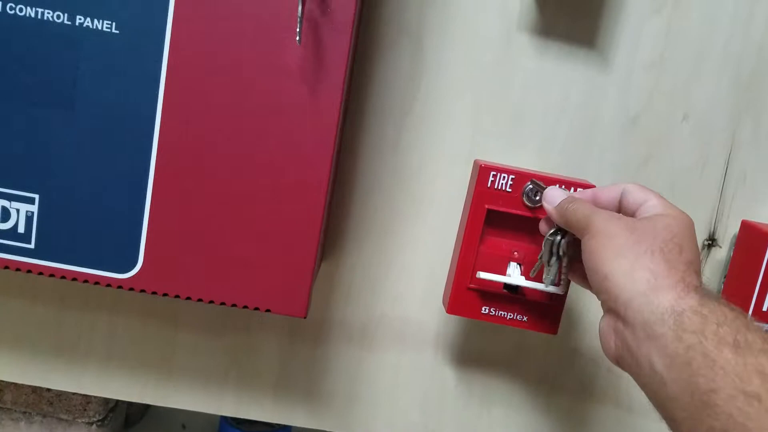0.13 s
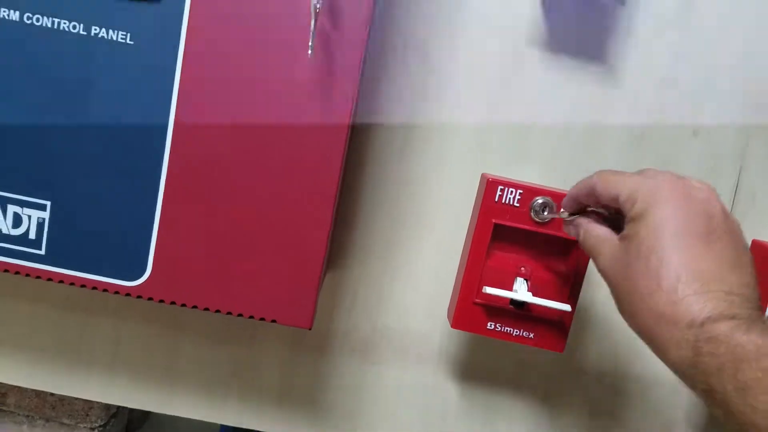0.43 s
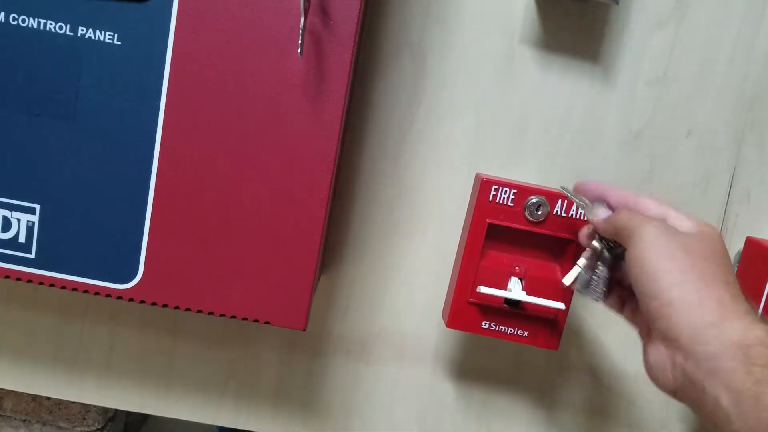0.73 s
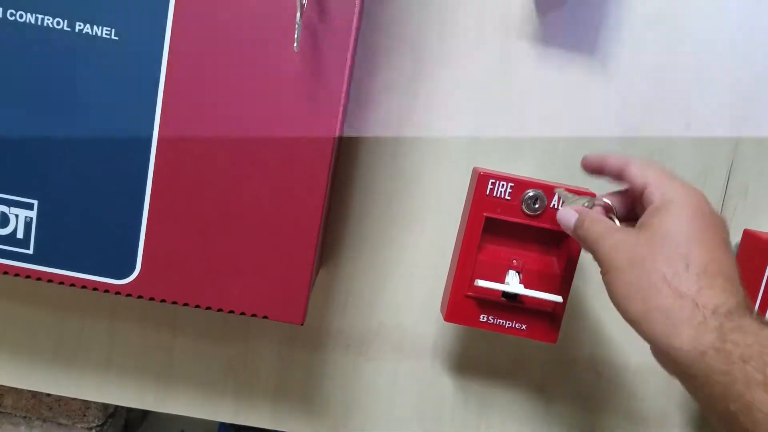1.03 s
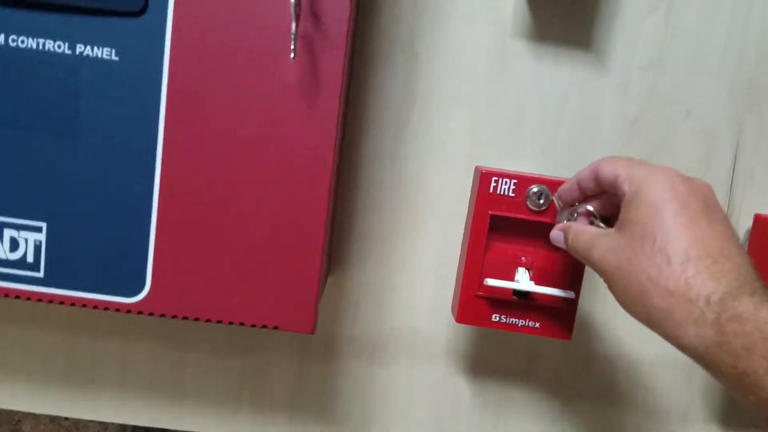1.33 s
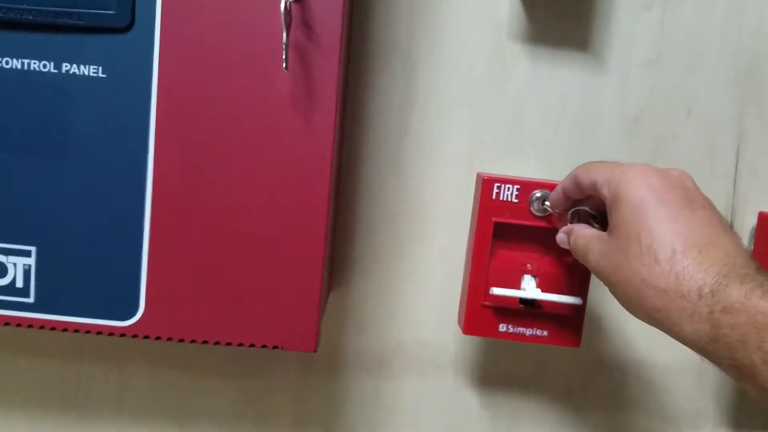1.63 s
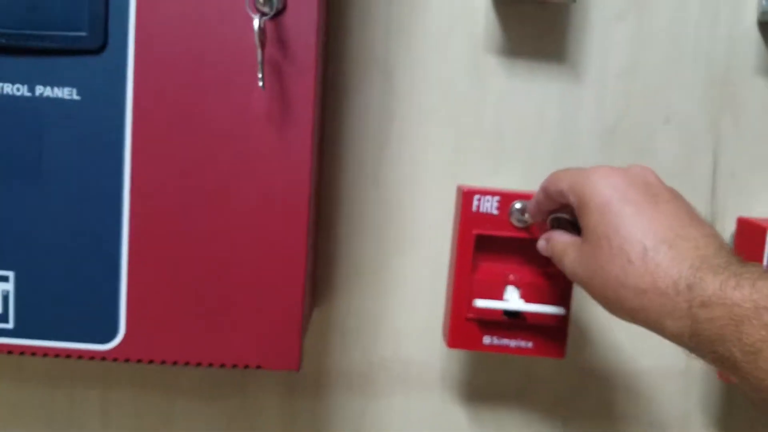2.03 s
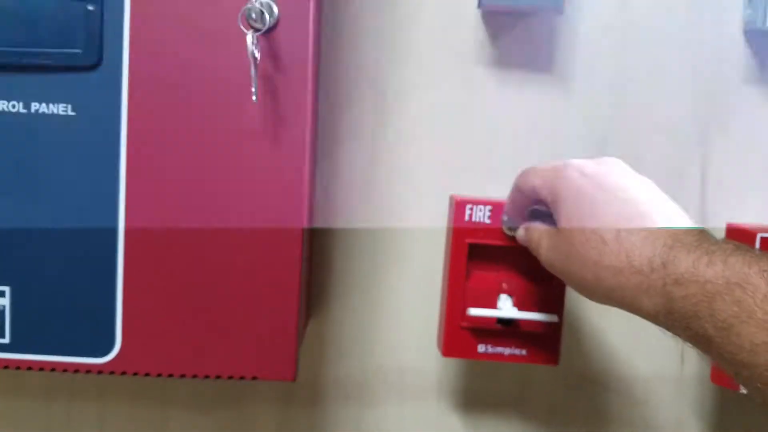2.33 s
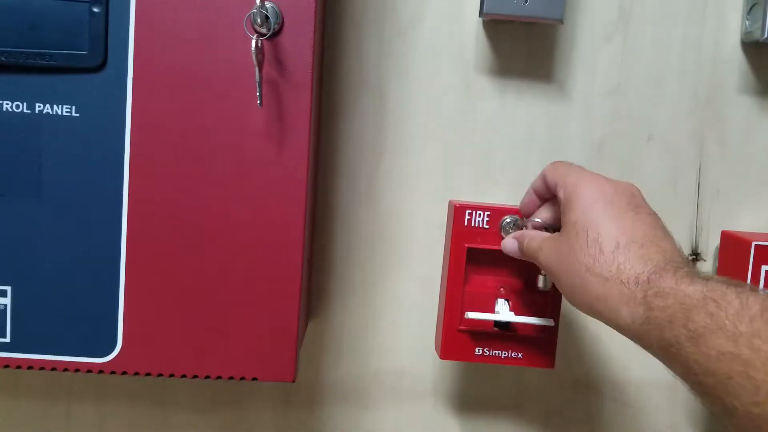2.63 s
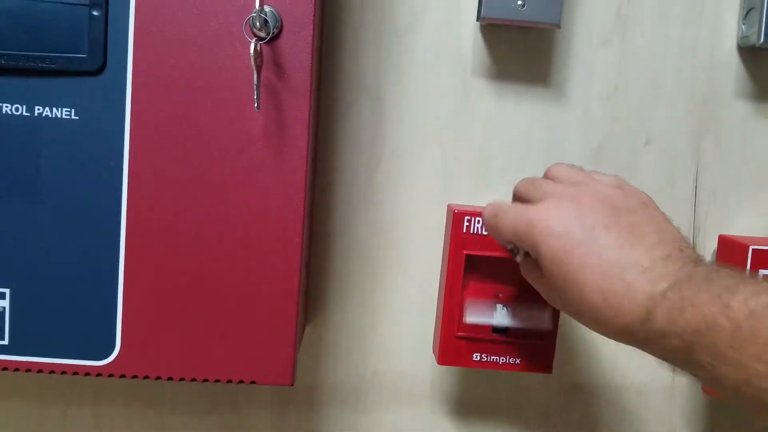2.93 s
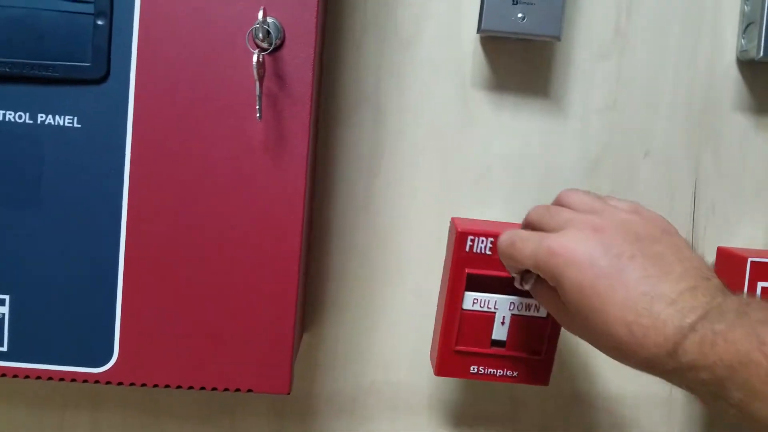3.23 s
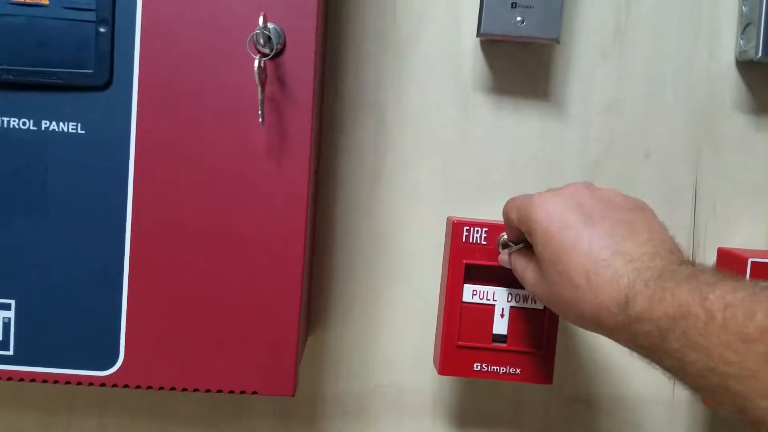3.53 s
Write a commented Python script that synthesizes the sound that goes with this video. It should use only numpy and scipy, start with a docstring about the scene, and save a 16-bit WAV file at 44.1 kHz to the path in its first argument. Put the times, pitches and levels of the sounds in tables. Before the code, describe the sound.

A key turns in the lock of a metal alarm box, close by. Keys clink lightly through the first second. The key knocks at the lock around 1.5 seconds, then scrapes and clicks from 2.2, making the box ring. Just before 3 seconds a sprung handle snaps back with a very loud, slightly distorted clack. Softer clicks follow until 3.7, with low hand rumble, in a faintly humming, echoing room.

```python
"""A key is pushed into the lock of a metal alarm box on a wall and turned.
It scrapes and knocks past the pins, which makes the box ring, while the other keys on the bunch clink.
Then the sprung handle snaps back with a clack that overloads the microphone.
Hands rumble softly, and the hard-walled room hums and echoes."""
import sys
import numpy as np
from scipy import signal
from scipy.fft import rfft, irfft
from scipy.io import wavfile

SR = 44100
rng = np.random.default_rng(int(sys.argv[2]) if len(sys.argv) > 2 else 0)


def output_pcm(signal):
    """Save a mono or channel-first signal as 16-bit PCM at the path in sys.argv[1].

    Samples are clipped to [-1, 1] before scaling.
    """
    pcm = np.clip(np.atleast_2d(signal).T, -1, 1) * 32767
    wavfile.write(sys.argv[1], SR, np.round(pcm).astype(np.int16))


N = 163170

# How alike the left and right channels are: f/Hz, likeness (1 = the same)
STEREO_LIKENESS = [(40, .5), (130, .95), (300, .95), (640, .88), (1400, .68), (2400, .35), (4200, -.2),
                   (8000, 0), (16000, .1)]
# The left microphone picks up the treble more strongly than the right: f/Hz, left minus right/dB
LEFT_LEAN = [(60, -3), (380, -1.5), (700, 0.5), (1300, 4), (2400, 8), (4400, 9), (8000, 0.5), (15000, 3)]


def lock():
    """The key scrapes over the pins and knocks the cylinder, which shakes the box."""
    # Each knock: t/s, body level/dB, thud level/dB, tick level/dB,
    # rise/s (long where the key rubs first), treble boost/dB (how bright or dull each knock rings)
    knocks = [(1.4763, -37, -54, -50, 0.00053, 7), (1.5101, -29.5, -46.5, -68, .001, -19),
              (1.5445, -22, -45, -36, 0.00071, -1.5), (1.5804, -26, -59, -64, 0.00053, -5.5),
              (1.834, -47, -75, -65, 0.00058, 9), (1.841, -46.5, -75, -59, 0.00091, 8.5),
              (1.8519, -33.5, -66, -46, 0.00046, 1.5), (2.123, -57.5, -57.5, -62, 0.0014, 11),
              (2.218, -43, -53, -60, 0.00011, 4.5), (2.2666, -25.5, -37, -32.5, 0.0018, 1.5),
              (2.345, -25.5, -52, -53, 0.0025, -7), (2.409, -33, -54, -38.5, 0.0015, -4),
              (2.423, -30, -57, -62.5, 0.0032, -6.5), (2.436, -29, -56, -65.5, 0.0034, -17),
              (2.472, -39, -44, -46, 0.0074, -6), (2.497, -22.5, -37.5, -41, 0.0011, -3),
              (2.525, -28.5, -41.5, -42.5, 0.0057, -11), (2.560, -27, -39.5, -39, 0.0041, 1),
              (2.5925, -20.5, -36.5, -34, 0.00093, -4.5), (2.749, -32.5, -48.5, -54, 0.0014, -6),
              (2.758, -35.5, -43, -45.5, 0.0012, 5.5), (2.784, -33.5, -40.5, -61.5, 0.0056, 1),
              (2.808, -34, -41, -62, 0.0021, 5), (2.828, -38, -35.5, -61, 0.0032, -7),
              (2.855, -42.5, -33, -67, 0.0089, -3), (2.8814, -24.5, -27, -30.5, 0.00052, 8),
              (2.891, -29, -32, -43.5, .001, 3.5), (2.927, -24, -27.5, -37, 0.0016, -8),
              (3.3161, -37.5, -44.5, -77.5, 0.0011, -6.5), (3.4247, -30.5, -33, -44.5, 0.005, 6.5),
              (3.593, -45.5, -66, -60, 0.0019, 1.5), (3.616, -45.5, -54, -55, 0.0023, 6.5),
              (3.675, -37, -59.5, -49, 0.0019, -6), (3.692, -33.5, -44, -53, 0.0037, -7)]
    # The tones the metal box rings at: f/Hz, level/dB, fade time/s
    box_tones = [(290, -29, .1), (330, -17.5, 0.052), (430, -11.5, 0.023), (761, -2, 0.028),
                 (972.4, -4, 0.096), (1128, -8, 0.074), (1450, -6.5, 0.061), (1640, -12, 0.028),
                 (3037, -7, 0.05), (3790, -2, .03), (4730, -15.5, .03)]
    # Tone colours of a knock's body, its low thud and its bright tick: f/Hz, level/dB
    body_colour = [(100, -32.5), (250, -8.5), (460, 1), (660, -3), (830, -2.5), (980, -1), (1250, -5.5),
                   (1450, -3.5), (2000, -3), (2500, -5), (3050, -5), (3800, -9.5), (4050, -13),
                   (5400, -27.5), (9000, -32), (16000, -57.5)]
    thud_colour = [(30, -71), (110, -8), (210, 12.5), (300, 7.5), (500, -31), (1000, -3), (4000, -83.5)]
    tick_colour = [(1000, -24), (3000, 1), (4400, 5.5), (5500, -3), (7000, 1), (8300, -13), (11000, 0),
                   (16000, -7.5)]
    # How strongly the key scrapes: t/s, level/dB
    scrape_levels = [(0, -48.5), (.3, -68), (1.45, -64), (1.5, -50.5), (1.59, -43), (1.66, -57),
                     (2.25, -71), (2.29, -41.5), (2.39, -49.5), (2.52, -34), (2.62, -58), (2.73, -49.5),
                     (2.78, -36), (2.93, -43.5), (3.0, -82.5), (3.56, -60.5), (3.62, -47), (3.7, -51.5)]
    out = tiny_contacts(body_colour, per_s=650, spread_db=-0.5, fade_s=0.017) * level(scrape_levels)
    low_pass = signal.butter(1, 1590, fs=SR)
    t = np.arange(16384) / SR
    for start, body_db, thud_db, tick_db, rise_s, treble_db in knocks:
        tones = detune(box_tones, share=.018)  # the hand's grip shifts the pitches
        body = ring(tones) * np.minimum(t / rise_s, 1)
        add(body, 0, burst(body_colour, hold_s=0.0047, fade_s=0.033, rise_s=rise_s))
        bass = signal.lfilter(*low_pass, body)
        add(out, start, amp(body_db - 2) * (bass + amp(treble_db) * (body - bass)))
        add(out, start, amp(thud_db) * burst(thud_colour, hold_s=0.0029, fade_s=0.12, rise_s=rise_s))
        add(out, start, amp(tick_db) * burst(tick_colour, hold_s=0.0055, fade_s=0.029, rise_s=rise_s))
    return out


def handle():
    """The spring catch lets go with a crack, and the handle rattles on its stop and rings."""
    # The handle hitting its stop: t/s, level/dB
    clacks = [(2.9491, -2), (2.952, -5)]
    # Tone colour of a clack: f/Hz, level/dB
    clack_colour = [(60, -34.5), (250, -12), (535, -24), (854, 1.5), (1200, -9.5), (1580, 1), (2080, -5),
                    (2700, -4.5), (3250, 5.5), (4100, -6.5), (5500, -21), (6600, -9.5), (8000, -17),
                    (11600, -13), (16000, -20.5)]
    # The tones the handle rings at: f/Hz, level/dB, fade time/s
    handle_tones = [(3240, -20.5, 0.092), (3270, -25, .07), (3470, -23, .09)]
    # The crack bouncing off nearby surfaces: delay/s, left gain, right gain
    bounces = [(.0205, .4, .09), (.0347, .27, .12), (.0438, .15, .06)]
    out = np.zeros((2, N))
    for start, db in clacks:
        add(out, start, amp(db - 3) * burst(clack_colour, hold_s=0.00092, fade_s=0.031))
    snap_time = clacks[0][0]
    add(out, snap_time, ring(handle_tones))
    t = np.arange(400) / SR
    crack_hz, crack_fade_s = 3200, .0038
    crack = 2.6 * np.sin(2 * np.pi * crack_hz * t) * amp(-60 * t / crack_fade_s)
    direct_path = (0.00064, 0.8, 0.2)
    for delay, left, right in [direct_path] + bounces:
        grit = 0.17 * burst(clack_colour, hold_s=0.0045, fade_s=0.022, size=400)
        add(out, snap_time + delay, (crack + grit) * np.array([[left], [right]]))
    return out * pan(left_db=4)


def hanging_keys():
    """The hanging keys tick against each other and ring very high, along with their hoop."""
    # Each touch: t/s, level/dB, extra level of the ringing key/dB, which key rings
    clinks = [(0.051, -43, -12, "long"), (0.071, -45.5, -5, "long"), (0.1422, -33, -2, "long"),
              (0.198, -41, -3, "long"), (0.2916, -45.5, -14, "short"), (0.348, -50, 13.5, "short"),
              (0.407, -46.5, -18, "long"), (.579, -32, 7, "long"), (0.6006, -36, 4, "long"),
              (0.612, -41, -9, "long"), (0.7246, -33, -14, "short"), (.7432, -30.5, -16, "long"),
              (.7682, -29, -14, "short"), (0.7875, -26, -14, "middle"), (0.8092, -28.5, -3, "middle"),
              (.824, -34, -10, "short"), (0.8377, -29.5, -17, "long"), (.8445, -34, -17, "short"),
              (0.9328, -36.5, -24, "long"), (1.0148, -49, 11.5, "short"), (1.683, -55, 14, "short"),
              (2.264, -32.5, -14, "short"), (2.3218, -43.5, 0, "short"), (2.561, -39, -18, "long"),
              (2.5932, -35, -14.5, "short"), (2.8104, -37, -20, "long"), (3.4874, -48, -1, "long"),
              (3.6158, -40.5, -2, "short"), (3.6833, -47, 2, "short")]
    # The pitch of each key: name, f/Hz
    key_hz = {"long": 14550, "middle": 14740, "short": 15140}
    # A key's tones, as shares of its pitch
    pitch_shares = [1, .996, .604, .973]
    # How each of those tones rings: level/dB, fade time/s
    key_rings = [(7.5, 0.017), (-17.5, .28), (-25, 0.074), (2, .02)]
    # The tones of the hoop that holds the keys: f/Hz, level/dB, fade time/s
    hoop_tones = [(3460, -24, .04), (8790, -14.5, 0.058)]
    # Tone colour of a clink: f/Hz, level/dB
    clink_colour = [(500, -45), (2400, -12.5), (3500, -11), (5000, -17), (7600, -12.5), (8800, -2),
                    (9700, -6.5), (11500, 2), (13200, -0.5), (14600, 1), (16000, 2)]
    # How strongly the whole bunch jangles: t/s, level/dB
    jangle_levels = [(0, -48), (.12, -60), (.25, -88), (.7, -77), (.75, -50), (.82, -33), (.88, -75),
                     (1.08, -73), (3.7, -114.5)]
    out = tiny_contacts(clink_colour, per_s=460, spread_db=3, fade_s=0.018) * level(jangle_levels)
    rise_s, shimmer_db, shimmer_fade_s = .0005, -14, .05
    for start, db, ring_db, key in clinks:
        key_tones = [(key_hz[key] * share, *rest) for share, rest in zip(pitch_shares, key_rings)]
        hoop = detune(hoop_tones, share=.04)  # the keys weigh on the hoop differently each time
        # Each touch stirs the other keys too.
        shimmer = [(hz, shimmer_db, shimmer_fade_s) for hz in rng.uniform(8500, 15600, size=7)]
        add(out, start + rise_s, amp(db) * ring(hoop + shimmer, size=4096))
        add(out, start, amp(db - 1) * burst(clink_colour, hold_s=.0035, fade_s=.011, rise_s=rise_s))
        add(out, start + rise_s, amp(db + ring_db) * ring(key_tones))
    return out * pan(left_db=4.5)


def hands():
    """Moving hands make a soft, low rumble."""
    # Tone colour of the rumble: f/Hz, level/dB
    rumble_colour = [(20, -18), (50, -3), (100, 3.5), (170, -1.5), (320, -9.5), (600, -23.5), (2000, -31.5),
                     (8000, -38.5)]
    # How the rumble comes and goes: t/s, level/dB
    rumble_levels = [(0, -52), (.55, -59.5), (.68, -46), (.8, -41), (.96, -43), (1.05, -51.5), (1.5, -67),
                     (2.2, -73.5), (2.7, -54), (3.12, -43.5), (3.23, -43), (3.32, -52), (3.7, -65)]
    return noise(rumble_colour, N, lean_left=False) * level(rumble_levels) * pan(left_db=8.5)


def electrical_hum():
    """Three low electrical tones, each wavering a little."""
    # The tones of the hum: f/Hz, level/dB
    hum_tones = [(122, -58.5), (241, -61), (673, -70.5)]
    # How the whole hum gets louder and softer: t/s, level change/dB
    hum_levels = [(0, 6), (1.4, 1), (1.8, -7), (2.2, -6), (3.7, -4.5)]
    t = np.arange(N) / SR
    hum = 0
    for hz, db in hum_tones:
        waver = normalise(noise([(1, 0), (5, -6), (20, -30), (100, -120)], N)[0])
        hum += amp(db) * np.sqrt(2) * np.sin(2 * np.pi * hz * t + 0.97 * waver)
    return hum * level(hum_levels)


def ventilation():
    """Air from the ventilation makes a quiet rush."""
    # Tone colour of the air: f/Hz, level/dB
    air_colour = [(20, -44), (60, -9), (110, -7.5), (170, -23.5), (330, -4.5), (600, -11.5), (1000, -18.5),
                  (2200, -26), (3200, -17), (4700, -25), (8000, -29.5), (12500, -30.5), (13500, -18),
                  (14300, -31), (16000, -21)]
    # How strong the rush is: t/s, level/dB
    air_levels = [(0, -53.5), (.9, -53), (1.4, -55), (2.2, -55.5), (3.7, -65)]
    return noise(air_colour, N, lean_left=False) * level(air_levels) * pan(left_db=3)


def room(sound, tail_db, build_s):
    """Hard walls add a few clear echoes and a smooth tail that dies sooner in the treble."""
    # How long the room rings: f/Hz, fade time/s
    fade_times = [(100, 0.99), (250, 1), (600, 0.43), (1500, 0.42), (3300, 0.46), (7000, 0.49),
                  (11000, 0.4), (16000, 0.38)]
    # Tone colour of the tail: f/Hz, level/dB
    tail_colour = [(60, -6.5), (250, 1), (1000, 2.5), (3200, -2.5), (7000, 3.5), (15000, 1.5)]
    # Echoes off the walls: delay/s, left gain, right gain
    echoes = [(.0046, 0.23, 0.029), (0.0135, 0.041, 0.31), (0.0432, 0.1, 0.06)]
    out = sound.copy()
    mono = 0.64 * sound[0] + 0.21 * sound[1]
    build_up = np.minimum(np.arange(SR) / SR / build_s, 1)
    for k in range(3):  # three tails take turns, as the hand and microphone move
        hz, t, bands = signal.stft(noise([(20, 0), (20000, 0)], SR), SR, nperseg=256)
        bands *= amp(look_up(tail_colour, hz)[:, None] - 60 * t / look_up(fade_times, hz)[:, None])
        tail = signal.istft(bands, SR, nperseg=256)[1][:, :SR] * build_up
        tail *= amp(tail_db) * np.sqrt(2) / np.linalg.norm(tail)
        share = np.sqrt(2 / 3) * np.cos(2 * np.pi * (2 * np.arange(N) / SR + k / 3))
        out += signal.fftconvolve((mono * share)[None], tail, axes=1)[:, :N]
    bass = signal.lfilter(*signal.butter(1, 1200, fs=SR), sound)
    for delay, left, right in echoes:  # the bass of an echo stays in the middle
        add(out, delay, bass * (left + right) / 2 + (sound - bass) * np.array([[left], [right]]))
    return out


def ring(tones, size=16384):
    """Struck metal rings, a bit differently each time; each tone drops 60 dB in its fade time."""
    t = np.arange(size) / SR
    out = np.zeros((2, size))
    for hz, db, fade_s in tones:
        random_db, turn, side = rng.standard_normal(3)
        phase_gap = np.arccos(np.clip(look_up(STEREO_LIKENESS, hz), -1, 1)) * np.sign(side)
        phase = np.pi * turn + np.array([[0], [phase_gap]])
        fade = amp(db + random_db - 60 * t / fade_s)
        out += pan(look_up(LEFT_LEAN, hz)) * fade * np.sin(2 * np.pi * hz * t + phase)
    return out * np.minimum(np.arange(size) / 10, 1)


def burst(colour, hold_s, fade_s, rise_s=0.00015, size=4096):
    """One contact: a puff of noise that swells, holds for a moment and dies away."""
    t = np.arange(size) / SR
    shape = amp(-60 * np.maximum(t - rise_s - hold_s, 0) / fade_s) * np.minimum(t / rise_s, 1)
    spectrum = rfft(noise(colour, size) * shape)
    # Even out chance peaks so that every contact has the same colour.
    strength = np.sqrt(np.mean(abs(spectrum) ** 2, 0) + 1e-20)
    wanted = amp(look_up(colour, np.fft.rfftfreq(size, 1 / SR)))
    evened = irfft(spectrum * wanted / strength, size)
    return normalise(evened * shape ** .25) * np.sqrt(np.mean(shape ** 2))


def tiny_contacts(colour, per_s, spread_db, fade_s):
    """A random stream of tiny contacts of uneven size, heard as a scrape or a jangle."""
    out = np.zeros((2, N))
    kinds = 10
    for _ in range(kinds):
        hits = rng.random(N) < per_s / kinds / SR
        clicks = hits * amp(spread_db * np.minimum(rng.exponential(1, N), 3))
        out += signal.oaconvolve(clicks[None], burst(colour, 0, fade_s), axes=1)[:, :N]
    return normalise(out)


def noise(colour, size, lean_left=True):
    """Stereo noise with the given tone colour; the two sides are alike in the bass."""
    hz = np.fft.rfftfreq(size, 1 / SR)
    left, unrelated = np.exp(2j * np.pi * rng.random((2, len(hz))))
    likeness = np.clip(look_up(STEREO_LIKENESS, hz), -1, 1)
    right = likeness * left + np.sqrt(1 - likeness ** 2) * unrelated
    lean_db = look_up(LEFT_LEAN, hz) / 2 * lean_left
    spectrum = np.array([left * amp(lean_db), right * amp(-lean_db)])
    return normalise(irfft(spectrum * amp(look_up(colour, hz)), size))


def detune(tones, share):
    """Nudge each tone up or down at random, by about this share of its pitch."""
    return [(hz * (1 + share * rng.standard_normal()), db, fade_s) for hz, db, fade_s in tones]


def amp(db):
    """Turn decibels into a gain to multiply by."""
    return 10 ** (np.asarray(db) / 20)


def normalise(sound):
    """Scale a sound to an average power of 1."""
    return sound / np.sqrt(np.mean(sound ** 2) + 1e-20)


def look_up(points, hz):
    """Read a table at any frequency, gliding between its rows."""
    freqs, values = np.transpose(points)
    return np.interp(np.log(hz + 1), np.log(freqs + 1), values)


def level(points):
    """Turn rows of t/s, level/dB into a gain for every sample."""
    return amp(np.interp(np.arange(N) / SR, *np.transpose(points)))


def pan(left_db):
    """Two gains that make the left side this much louder than the right."""
    return amp(np.array([[left_db], [-left_db]]) / 2)


def add(mix, start_s, sound):
    """Add a sound to the mix at the given time."""
    part = mix[:, round(start_s * SR):][:, :sound.shape[1]]
    part += sound[:, :part.shape[1]]


def scene():
    """Keys, lock and handle echo in the room, over the quiet background."""
    out = room(hanging_keys(), tail_db=-8, build_s=.022)
    out += room(lock(), tail_db=-4, build_s=0.016)
    out += room(handle(), tail_db=-4, build_s=0.027)
    return out + electrical_hum() + ventilation() + hands()


def record(dry, threshold_db=-21, duck=0.5, recover_db_per_s=14):
    """The clack clips; the recorder turns itself down, slowly recovers and cuts the highest treble."""
    power = signal.lfilter(np.ones(512) / 512, 1, (dry ** 2).mean(0))
    power_db = 10 * np.log10(abs(power) + 1e-12)
    fall_db = np.arange(N) / SR * recover_db_per_s
    held_peak_db = np.maximum.accumulate(power_db + fall_db) - fall_db
    over_db = np.maximum(held_peak_db - threshold_db, 0)
    react_s, clip_level, top_hz = .12, .85, 15950
    lag = np.exp(-1 / (react_s * SR))
    gain = amp(-duck * signal.lfilter([1 - lag], [1, -lag], over_db))
    clipped = np.clip(dry * gain, -clip_level, clip_level)
    low_pass = signal.firwin(301, top_hz, window=("kaiser", 8), fs=SR)
    return signal.oaconvolve(clipped, low_pass[None], "same")


dry = scene()
out = record(dry)
output_pcm(out)
```